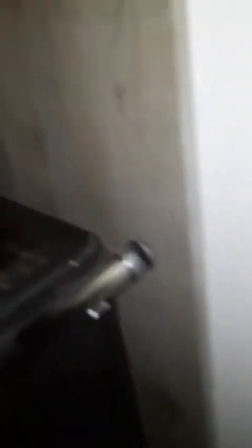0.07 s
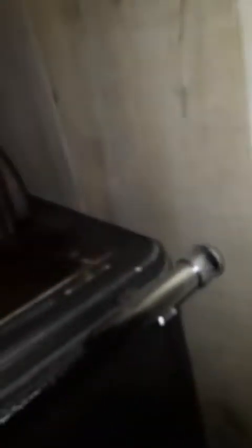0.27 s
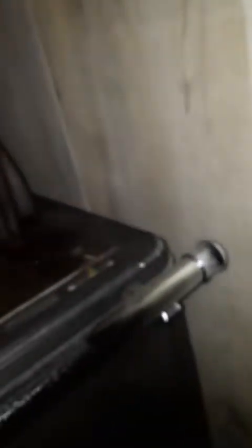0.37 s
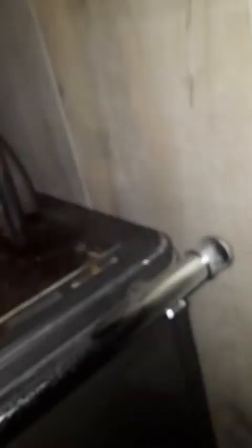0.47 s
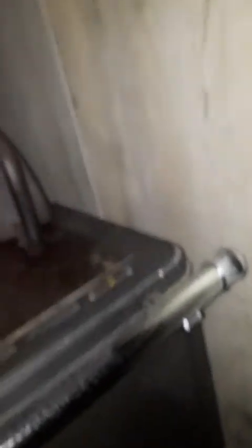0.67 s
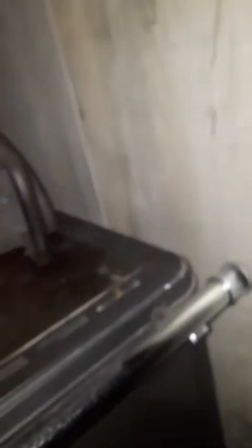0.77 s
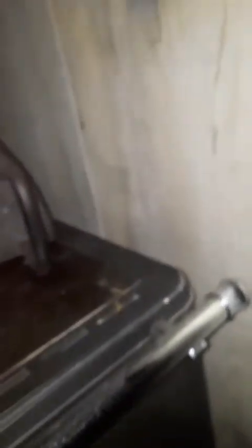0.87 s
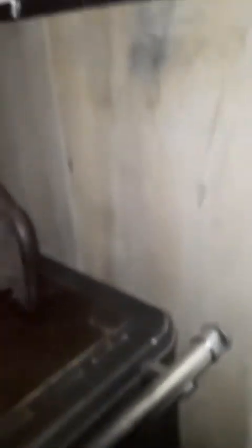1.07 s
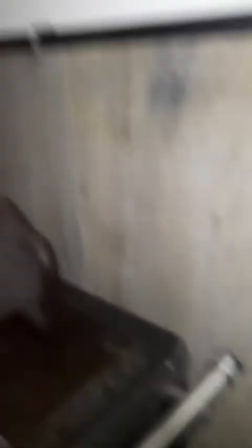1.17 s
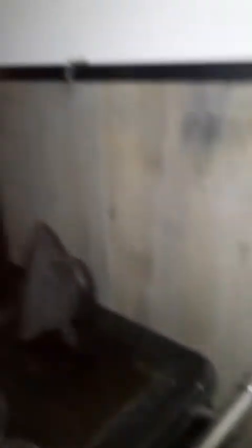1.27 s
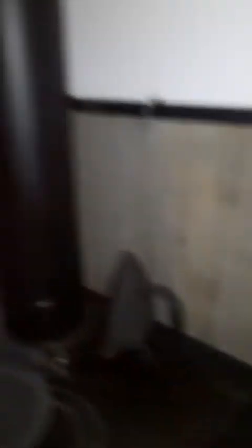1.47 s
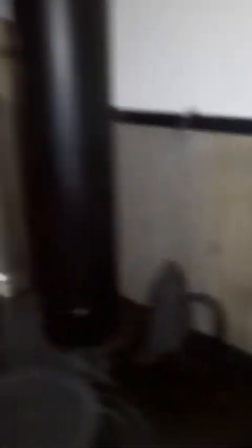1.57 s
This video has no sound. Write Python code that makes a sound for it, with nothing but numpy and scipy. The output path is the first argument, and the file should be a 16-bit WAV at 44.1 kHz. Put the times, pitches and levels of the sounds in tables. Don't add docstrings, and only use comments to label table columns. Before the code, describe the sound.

Wood pellets rattle into a metal burner tube, swelling quickly to a hollow, clanking rush, then thinning to single ticks and small steel rings. Bare, lively room, close handheld stereo pickup, faint air noise.

```python
import sys
import numpy as np
from scipy import signal
from scipy.fft import rfft, irfft, next_fast_len
from scipy.io import wavfile
from scipy.ndimage import map_coordinates

SR = 44100
rng = np.random.default_rng(int(sys.argv[2]) if len(sys.argv) > 2 else 0)


def waveform_to_disk(signal):
    frames = np.transpose(np.atleast_2d(signal))
    scaled = np.clip(frames, -1, 1) * 32767
    samples = np.round(scaled).astype(np.int16)
    wavfile.write(sys.argv[1], SR, samples)


def gain_from_decibels(decibels):
    exponent = np.asarray(decibels, float) / 20
    return 10 ** exponent


N = 70560


def unit(x):
    return x / np.sqrt(np.mean(x ** 2) + 1e-20)


def along(points, hz):
    f, value = np.transpose(points)
    return np.interp(np.log(hz + 1), np.log(f + 1), value)


def wobble(rate):
    knots = rng.standard_normal(int(N * rate / SR) + 4)
    return map_coordinates(knots, [np.arange(N) * rate / SR])


def filtered(x, response):
    m = next_fast_len(N + SR // 2)
    return irfft(rfft(x, m) * response(np.fft.rfftfreq(m, 1 / SR)), m)[..., :N]


def highpass(f, corner_hz):
    return 1j * f / (corner_hz + 1j * f)


def ringing(peaks):
    def response(f):
        total = 0
        for k, (centre, width, db) in enumerate(peaks):
            band = 1j * f * width
            total = total + (-1) ** k * gain_from_decibels(db) * band / (centre * centre - f * f + band)
        return total
    return response


def steep(peaks):
    return lambda f: ringing(peaks)(f) * highpass(f, peaks[0][0] * 0.91) ** 2


def causal(spectrum):
    def response(f):
        cepstrum = irfft(np.log(np.maximum(gain_from_decibels(along(spectrum, f)), 1e-6)))
        half = len(cepstrum) // 2
        cepstrum[1:half] *= 2
        cepstrum[half + 1:] = 0
        return np.exp(rfft(cepstrum))
    return response


# f/Hz, density/dB per Hz
AIR_COLOUR = [(25, -3), (120, -15), (230, -19), (330, 8), (600, -10), (1500, -23), (5000, -31),
              (15000, -45)]


def air_noise():
    level_db = -62
    noise = rng.standard_normal((2, N))
    return gain_from_decibels(level_db) * unit(filtered(noise, lambda f: gain_from_decibels(along(AIR_COLOUR, f))))


def reflections(x, decays, low_hz, count):
    noise = rng.standard_normal((count, 2, SR // 3))
    hz, t, z = signal.stft(noise, SR, nperseg=128)
    fade = gain_from_decibels(-60 * t / along(decays, hz)[:, None])
    tails = signal.istft(z * fade, SR, nperseg=128)[1]
    tails = tails / np.linalg.norm(tails, axis=-1, keepdims=True)
    thin = filtered(x, lambda f: highpass(f, low_hz) ** 2)
    late = np.pad(thin, (60, 0))[:N]
    place = np.arange(N) * (count - 1) / N - np.arange(count)[:, None]
    parts = late * np.cos(np.pi / 2 * np.clip(place, -1, 1))
    return signal.fftconvolve(parts[:, None], tails, axes=2).sum(axis=0)[:, :N]


# f/Hz, t60/s
ROOM_DECAY = [(150, 0.43), (600, 0.4), (3000, 0.46), (10000, 0.48)]


def bare_room(x):
    return gain_from_decibels(-0.5) * reflections(x, ROOM_DECAY, low_hz=284, count=10)


# f/Hz, t60/s
NEAR_DECAY = [(500, 0.022), (3000, 0.015), (10000, 0.015)]


def near_walls(x):
    return gain_from_decibels(1) * reflections(x, NEAR_DECAY, low_hz=1130, count=36)


# t/s, f/Hz, level/dB, t60/s
CLEAR_RINGS = [(0.096, 132, -38, 0.18), (0.137, 170, -29.5, 0.12), (0.217, 172, -30, 0.12),
               (.283, 127, -25.5, .12), (.3, 4120, -21.5, 0.026), (.424, 600, -15.5, 0.17),
               (0.425, 1968, -16, 0.034), (.433, 2350, -21, .025), (0.436, 98, -13.5, 0.11),
               (.452, 120, -18, 0.15), (.445, 176.3, -19, .14), (.49, 180, -23.5, .12),
               (.455, 591, -18.5, 0.12), (.488, 594, -21, 0.11), (.532, 550, -13.5, 0.059),
               (.542, 2050, -28, .03), (.55, 174, -9, 0.067), (.556, 769, -12, 0.068),
               (.556, 989, -20, 0.11), (0.57, 306, -16, 0.074), (.452, 242, -25.5, 0.097),
               (.593, 3170, -20, 0.039), (.594, 501, -17, 0.096), (.612, 785, -13, 0.077),
               (.618, 2170, -13, 0.025), (.655, 304.4, -14.5, 0.12), (.659, 1966, -14, 0.053),
               (.66, 640.6, -22.5, 0.18), (.798, 883, -35, 0.072), (0.837, 323, -12, 0.027),
               (.853, 880, -19.5, 0.077), (0.979, 317, -19, 0.07), (1.044, 344, -40, 0.061),
               (1.085, 309, -23.5, 0.14), (1.086, 437, -37, 0.11), (1.095, 612, -22, .1),
               (1.115, 583, -21.5, 0.15), (1.139, 125.5, -26, 0.19), (1.216, 586, -32, 0.18),
               (1.225, 495.6, -26.5, 0.2), (1.271, 359, -33.5, 0.13), (1.3146, 5860, -27, 0.0095),
               (1.3146, 3400, -26, .015), (1.368, 830, -36, 0.081), (1.392, 463, -34, 0.11),
               (1.455, 625, -32.5, 0.05), (1.474, 550, -33, 0.1), (1.549, 630, -29.5, 0.046),
               (1.548, 527, -42, 0.039)]


def pings():
    attack_cycles = 1.14
    out, t = np.zeros(N + SR), np.arange(SR // 4) / SR
    for start, hz, db, t60 in CLEAR_RINGS:
        tone = np.sin(2 * np.pi * hz * t) * (1 - np.exp(-t * hz / attack_cycles))
        out[round(start * SR):][:len(t)] += gain_from_decibels(db - 60 * t / t60) * tone
    return out[:N]


# t/s, peak level/dB, ring of the tube air/dB, ring of the rim/dB, hardness/dB
CLEAR_PELLETS = [(0.0344, -32, -11, -42, -4), (0.0567, -23, -6, -21, 1), (0.067, -24, -9, -10, 2.5),
                 (0.184, -29, -7, -18, -10), (0.2844, -26, 7, -22, 0), (0.2972, -27, -2, -18, 0),
                 (0.3903, -23, 3, -24, -12), (0.3955, -24.5, -1, -5, -14), (0.421, -22.5, -8, -12.5, 6),
                 (0.4257, -15.5, -12, -14, 3.5), (0.4332, -14.5, -3.5, -15.5, -1.5),
                 (0.5844, -26, -30, -17, 16), (0.607, -9.5, -6, -22, -0.5), (0.624, -22, -12, -21, 10),
                 (0.6592, -19.5, 0, -24, 6), (0.7986, -31, -16, -3.5, 7), (0.8134, -29.5, -1, 0, 6),
                 (0.841, -19, -1, -12.5, -5), (0.9258, -26, -5, -33, -7), (0.9622, -29, -3.5, -24, 5.5),
                 (0.978, -23, -0.5, -16, 6), (1.0427, -20, -7, -37, -1.5), (1.0584, -29.5, -2, -10, -1),
                 (1.0858, -22, -2.5, -17, 4.5), (1.1224, -31, -12, -27, 3.5),
                 (1.1591, -26.5, -14, -13, -0.5), (1.2161, -28, 11.5, -19, 5),
                 (1.3145, -28.5, -11, -27, 7.5), (1.324, -34, -8, -29, -2), (1.332, -45, -8, -38, 2),
                 (1.3684, -29, 1, -34, -1.5), (1.3722, -34, -1, -34, -8), (1.3902, -35.5, -17.5, -31, -4),
                 (1.4552, -34.5, 1, -38, 0), (1.549, -37, -2, -24, 0)]
TUBE_AIR_COLUMN, RIM_COLUMN, HARDNESS_COLUMN = 2, 3, 4


def landings(column, snap):
    bounce_t60_s, landing_db = 0.016, -3.5
    out, t = np.zeros(N + SR), np.arange(SR // 10) / SR
    for row in CLEAR_PELLETS:
        db = row[1] + landing_db + (row[column] if column else 0)
        chatter = rng.standard_normal(len(t))
        chatter[0] = snap
        out[round(row[0] * SR):][:len(t)] += gain_from_decibels(db - 60 * t / bounce_t60_s) * chatter
    return out[:N]


def knocks():
    knocks_per_s, size_spread_db, clump_db = 2500, 4, 1.5
    hit = rng.random(N) < knocks_per_s / SR
    size = gain_from_decibels(size_spread_db * rng.exponential(size=N) ** 0.69) * rng.standard_normal(N)
    clumps = gain_from_decibels(clump_db * (wobble(11.47) + wobble(40.4)))
    return unit(hit * size * clumps)


def body(response, level_db, landing):
    gain = np.abs(response(np.fft.rfftfreq(8192, 1 / SR)))
    blows = gain_from_decibels(level_db) * knocks() + landing
    return filtered(blows, response) / np.sqrt(np.mean(gain ** 2))


# f/Hz, density/dB per Hz
DUST_COLOUR = [(6000, 0), (9000, 8.5), (9700, -15), (10500, 3.5), (13000, 4.5), (15300, -1.5)]


def dust_fizz(level_db, hard):
    return body(causal(DUST_COLOUR), level_db, gain_from_decibels(-28) * hard)


# f/Hz, width/Hz, level/dB
BOWL_MODES = [(93.4, 41, -2), (136.1, 18.6, 3), (177.1, 12.3, 2.5), (242, 18, -4.5)]


def bowl(level_db):
    return body(steep(BOWL_MODES), level_db, 0)


# f/Hz, width/Hz, level/dB
WALL_MODES = [(234, 41, -5), (307.7, 32, 1.5), (361, 119, -5)]


def tube_wall(level_db):
    return body(steep(WALL_MODES), level_db, 0)


# f/Hz, width/Hz, level/dB
RIM_MODES = [(880, 62, 7), (968, 31, -6)]


def tube_rim(flow):
    return body(steep(RIM_MODES), flow - 10.5, landings(RIM_COLUMN, snap=25.0))


# f/Hz, width/Hz, level/dB
TUBE_AIR_MODES = [(439.3, 93, -6), (477, 74, -5), (536.3, 19.7, -2), (600, 79, -5), (670.6, 101, -2.5),
                  (721, 164, -7)]


def tube_air(level_db):
    return body(steep(TUBE_AIR_MODES), level_db, landings(TUBE_AIR_COLUMN, snap=7.5))


# f/Hz, density/dB per Hz
CLICK_COLOUR = [(410, -31.5), (700, -5), (1230, -0.5), (1950, -2.5), (2750, -6.5), (3060, -4.5),
                (4040, -5.5), (8260, -23), (9000, -22.5), (11700, -121), (19800, -120)]
# f/Hz, width/Hz, level/dB
STEEL_MODES = [(1948, 450, -2), (2365, 89, 8.5), (2800, 34, -60), (4580, 100, -14), (5100, 50, -51),
               (1473, 51, 8)]


def clatter(flow, hard):
    hard_hz = 3140
    dull = landings(None, snap=15)
    blows = filtered(hard, lambda f: highpass(f, hard_hz) ** 2)
    blows = blows + filtered(dull, lambda f: 1 - highpass(f, hard_hz))
    return body(lambda f: causal(CLICK_COLOUR)(f) * (1 + ringing(STEEL_MODES)(f)), flow, blows)


# load shifting in the bowl/dB,
# share falling inside the tube/dB, share on the tube wall/dB, dust/dB
POUR_COURSE = [(0.0, -43, -17, -5, -5, -15.5), (0.086, -34.5, -7, -2.5, -15.5, -12.5),
               (0.276, -40.5, -1.5, -1.5, -2.5, -25.5), (0.37, -40.5, -1, -2.5, 0.5, -24),
               (0.437, -25.5, 1.5, -2.5, -10.5, -22), (0.476, -25.5, -4, -3.5, -9, -28),
               (0.55, -23.5, -3.5, -7, -5, -15.5), (0.623, -23.5, -9, -5.5, -5.5, -17),
               (0.693, -32, 0.5, 1, -0.5, -21), (0.762, -45.5, 0, 3, 0, -13),
               (0.81, -33, -6.5, -10, -9, -19), (0.848, -37.5, -5.5, -4, 5, -30),
               (0.894, -44, -13, -10.5, 0.5, -22), (1.056, -38.5, -4, 0.5, 0, -7),
               (1.144, -38, -6.5, 2, 1.5, -7), (1.31, -50, -12.5, 4.5, -6.5, -23.5),
               (1.452, -63, -10.5, 13, -0.5, -23), (1.6, -62.5, -29, 2, -13, -28)]


def pour():
    s, *columns = np.transpose(POUR_COURSE)
    flow, load, inside, wall, dust = [np.interp(np.arange(N) / SR, s, c) for c in columns]
    hard = landings(HARDNESS_COLUMN, snap=15)
    stream = clatter(flow, hard) + dust_fizz(flow + dust, hard)
    stream = stream + bowl(flow + load) + tube_air(flow + inside)
    return stream + tube_wall(flow + wall) + tube_rim(flow)


# f/Hz, level/dB
LEFT_OVER_RIGHT_DB = [(60, 0.0), (240, 0.5), (950, 2.5), (3770, 0), (15000, -3)]


def scene():
    stream, rings, air = pour(), pings(), air_noise()
    left_lag_s = 17 / 44100
    far = stream + gain_from_decibels(-4) * rings
    side = np.array([[1], [-1]])
    direct = filtered(stream + rings, lambda f: np.exp(-1j * np.pi * f * left_lag_s * side))
    echo = near_walls(far) + bare_room(far)
    return filtered(direct + echo, lambda f: gain_from_decibels(side * along(LEFT_OVER_RIGHT_DB, f) / 2)) + air


def low_pass(x):
    return signal.sosfilt(signal.butter(12, 15800, fs=SR, output="sos"), x)


def record(dry):
    ceiling, top_hz = 0.75, 15500
    soft = ceiling * np.tanh(dry / ceiling)
    mix = filtered(soft, lambda f: f < top_hz)
    return low_pass(mix)


dry = scene()
out = record(dry)
waveform_to_disk(out)
```